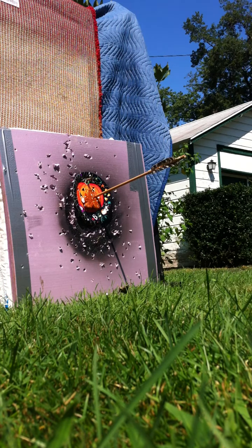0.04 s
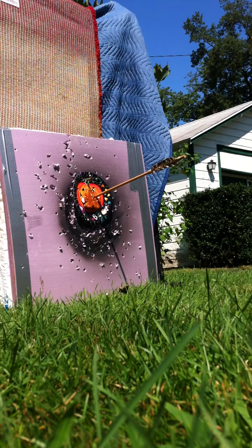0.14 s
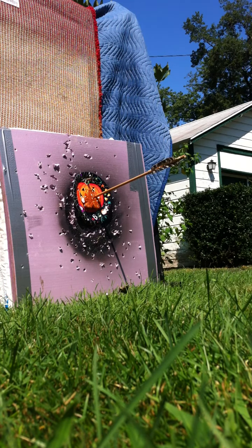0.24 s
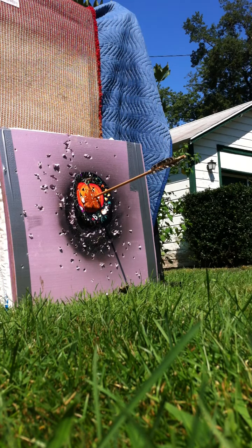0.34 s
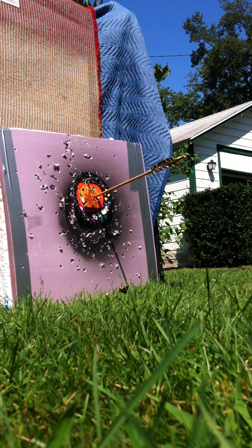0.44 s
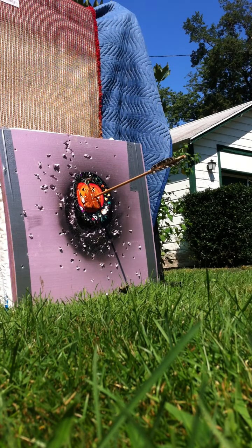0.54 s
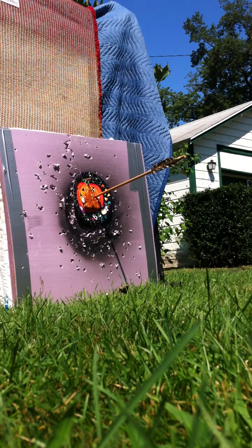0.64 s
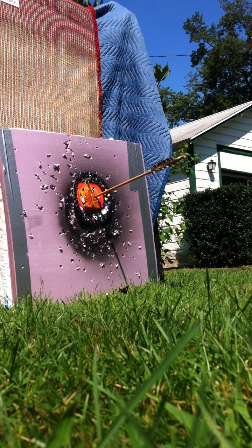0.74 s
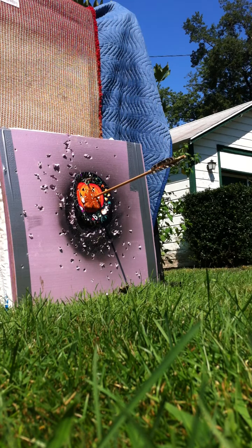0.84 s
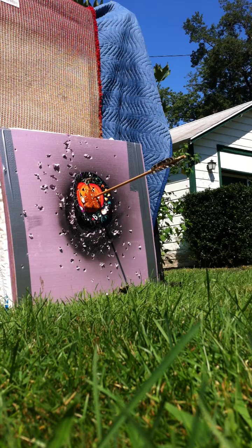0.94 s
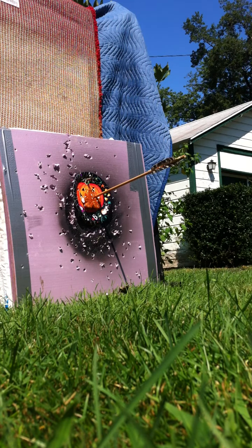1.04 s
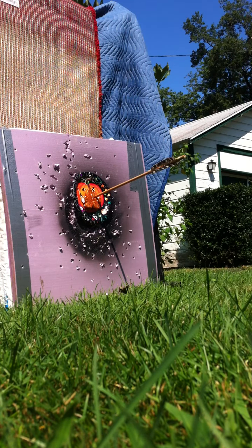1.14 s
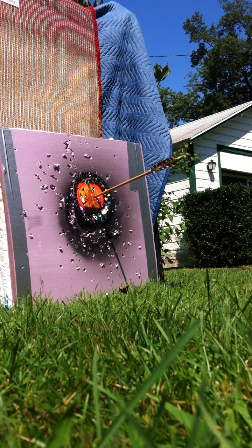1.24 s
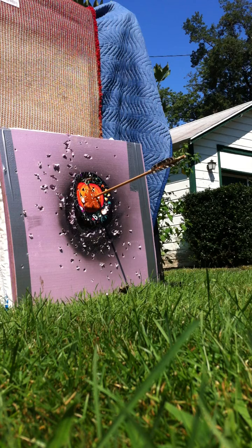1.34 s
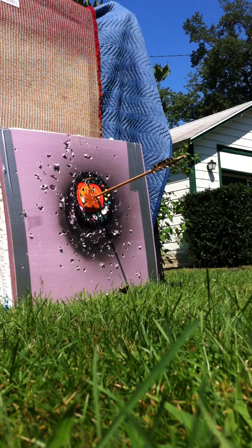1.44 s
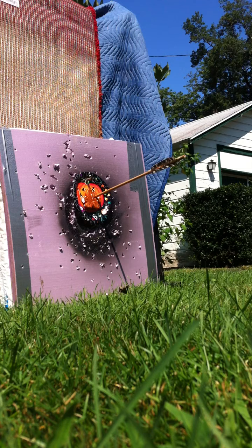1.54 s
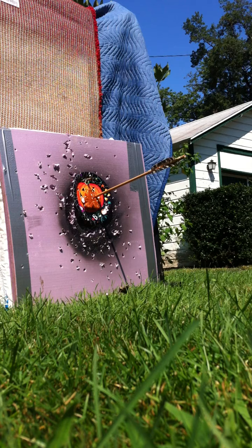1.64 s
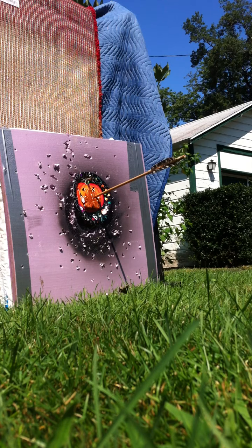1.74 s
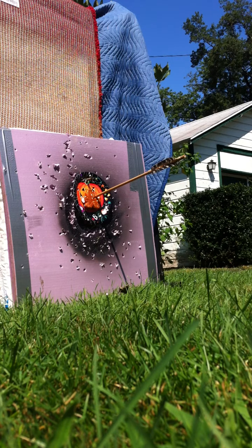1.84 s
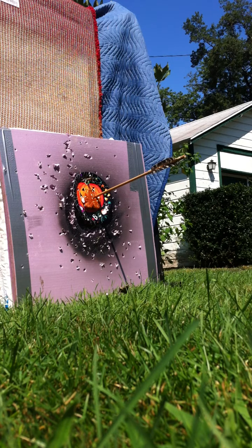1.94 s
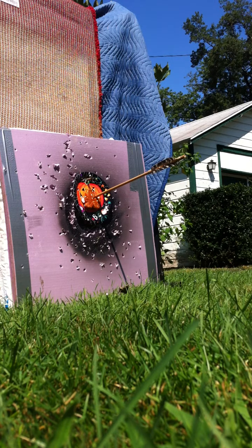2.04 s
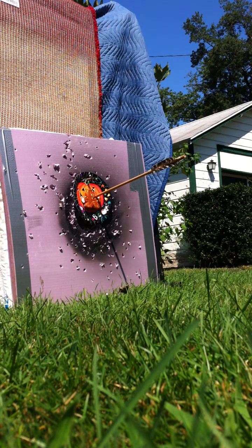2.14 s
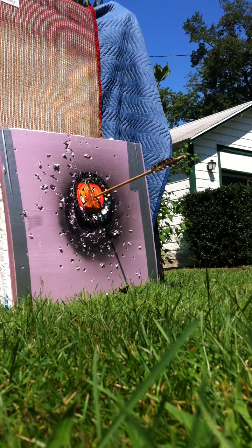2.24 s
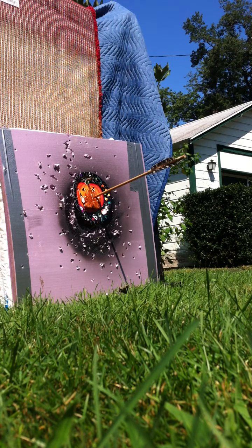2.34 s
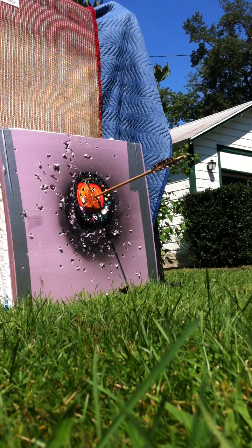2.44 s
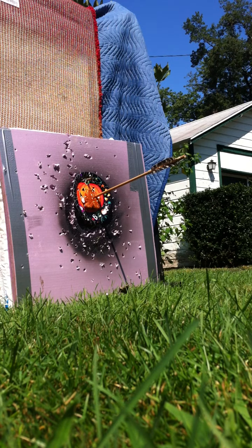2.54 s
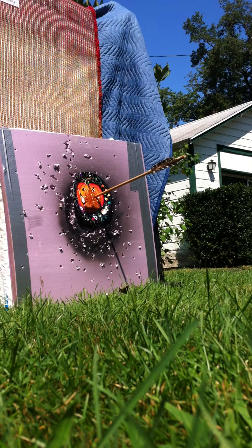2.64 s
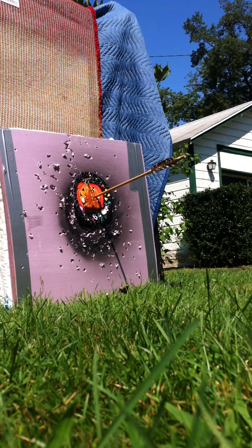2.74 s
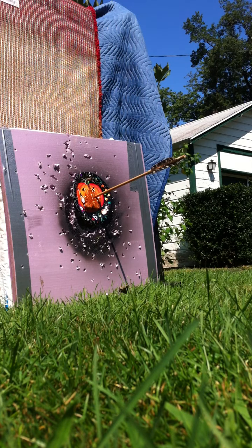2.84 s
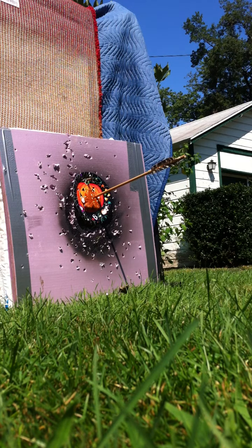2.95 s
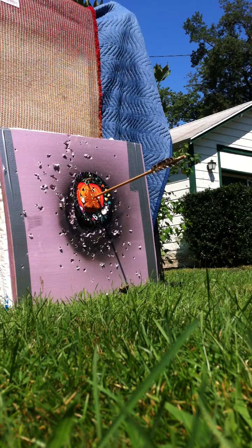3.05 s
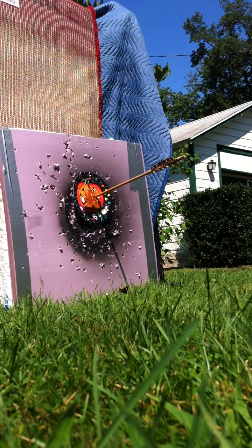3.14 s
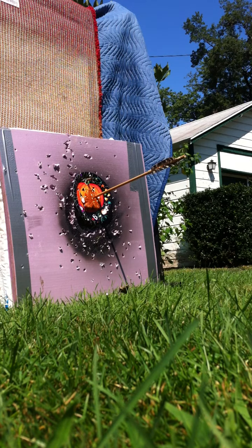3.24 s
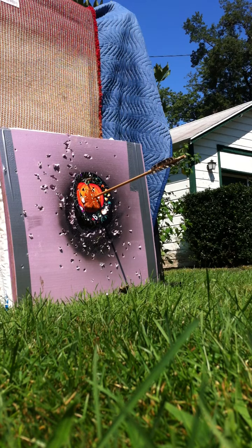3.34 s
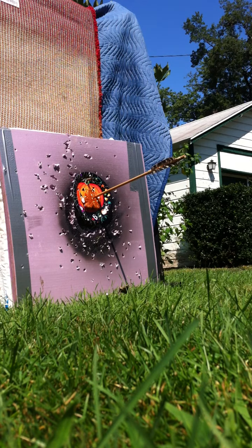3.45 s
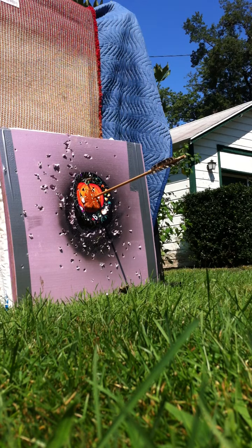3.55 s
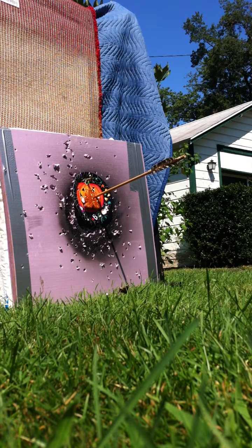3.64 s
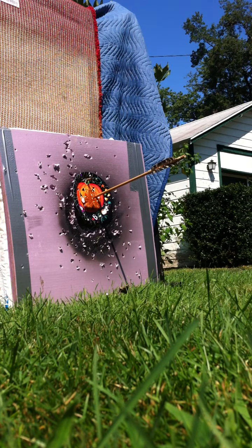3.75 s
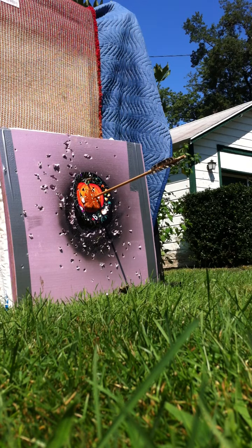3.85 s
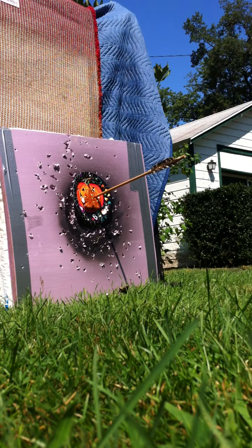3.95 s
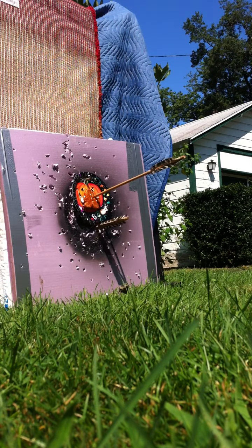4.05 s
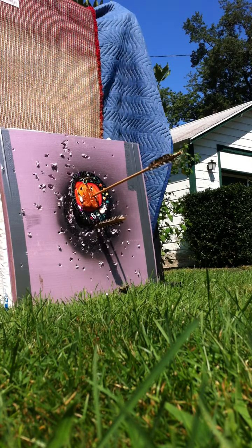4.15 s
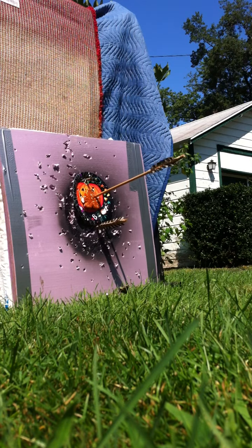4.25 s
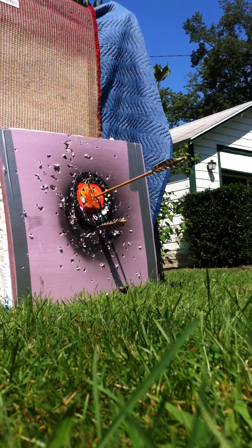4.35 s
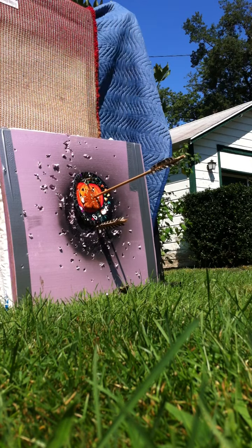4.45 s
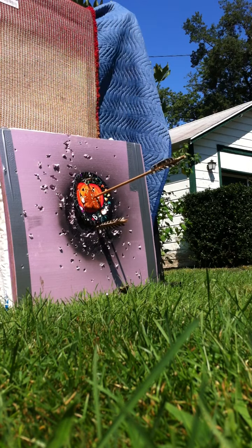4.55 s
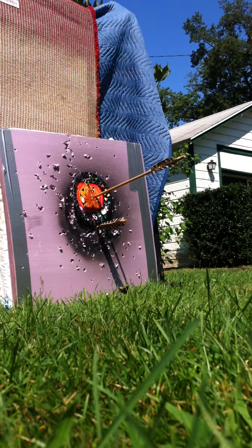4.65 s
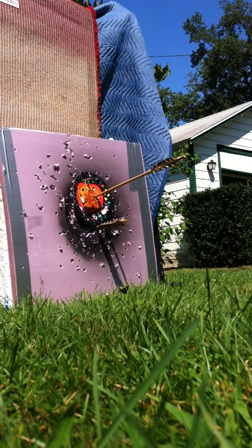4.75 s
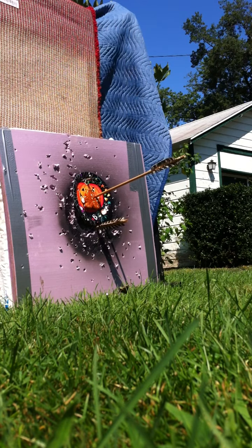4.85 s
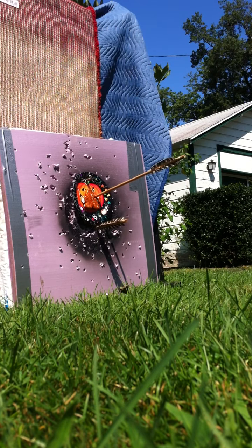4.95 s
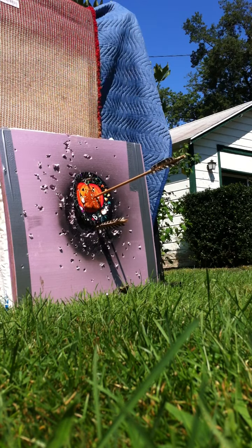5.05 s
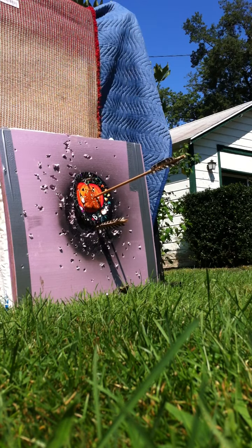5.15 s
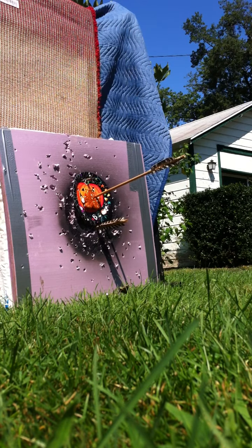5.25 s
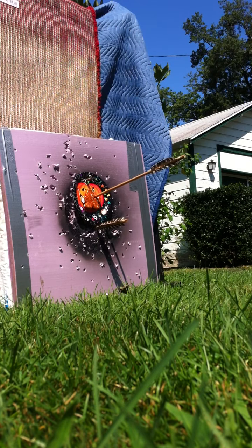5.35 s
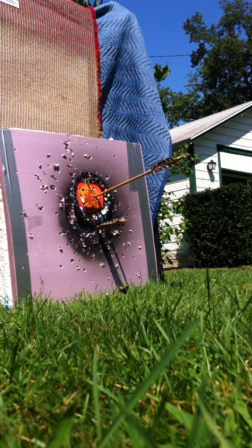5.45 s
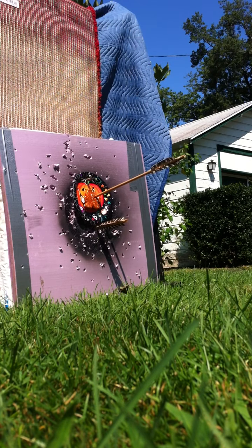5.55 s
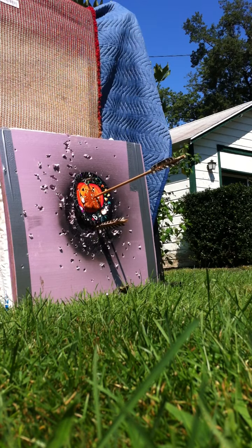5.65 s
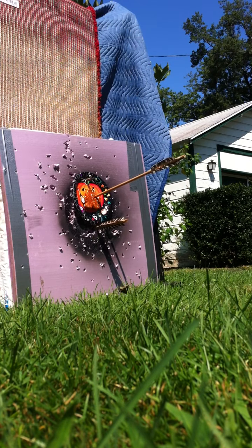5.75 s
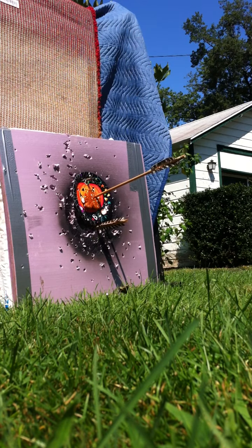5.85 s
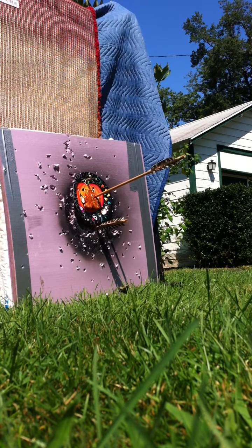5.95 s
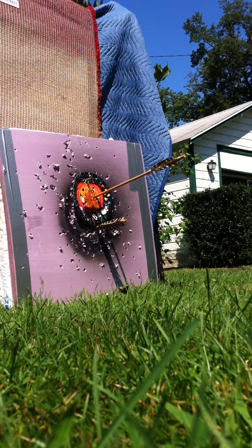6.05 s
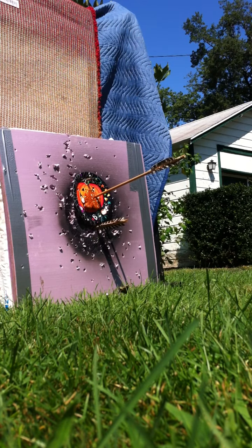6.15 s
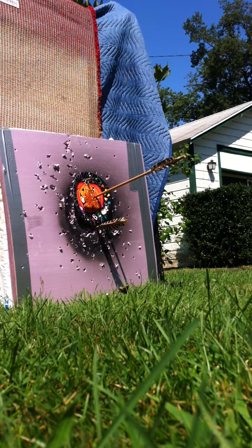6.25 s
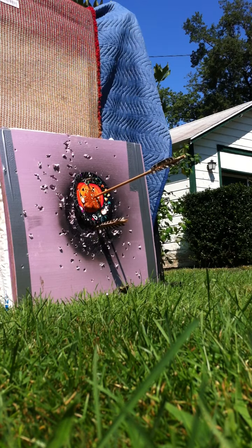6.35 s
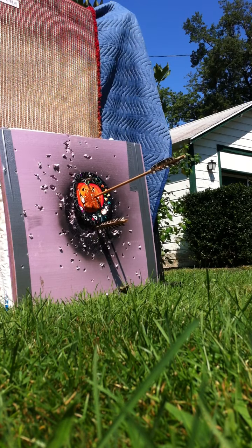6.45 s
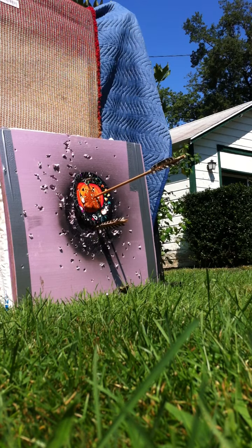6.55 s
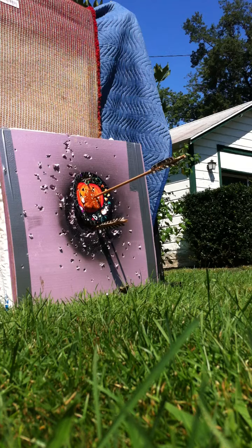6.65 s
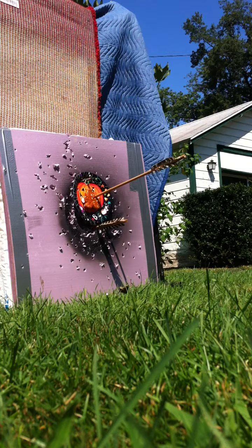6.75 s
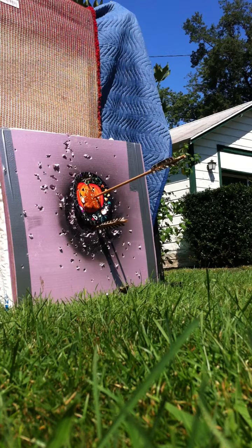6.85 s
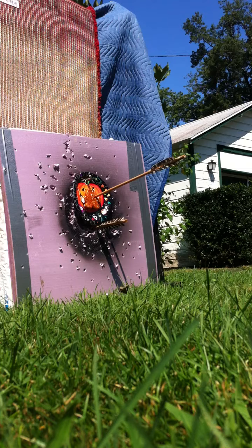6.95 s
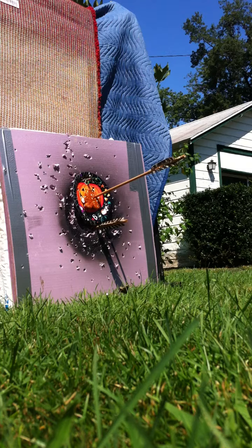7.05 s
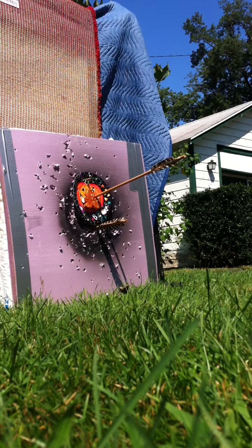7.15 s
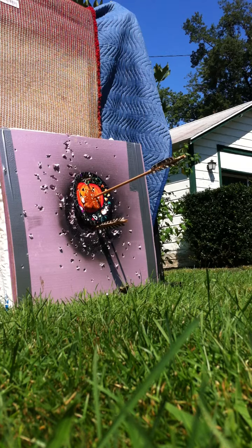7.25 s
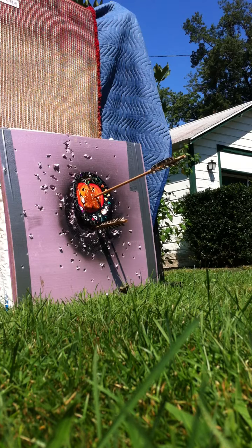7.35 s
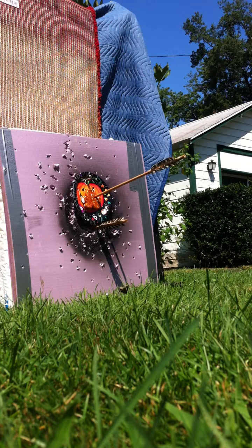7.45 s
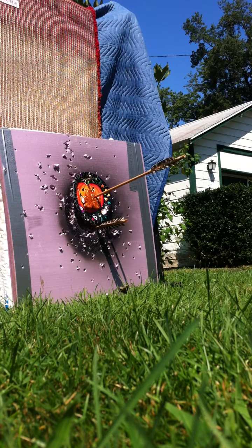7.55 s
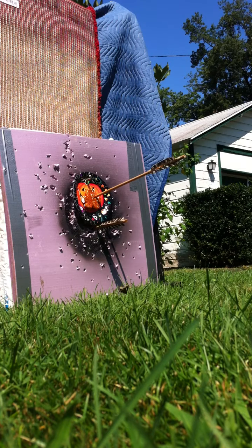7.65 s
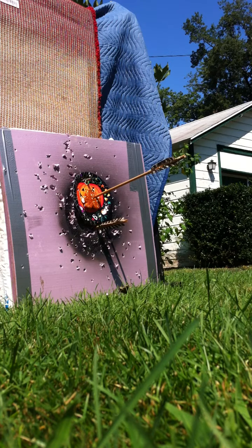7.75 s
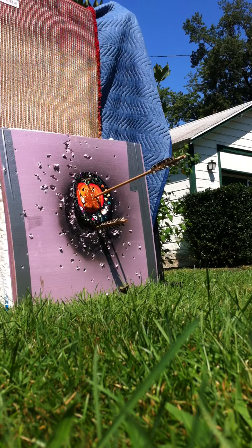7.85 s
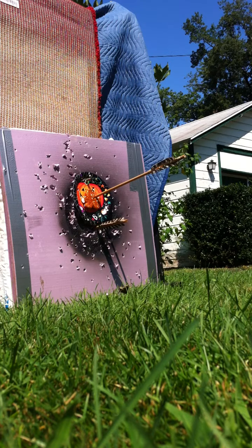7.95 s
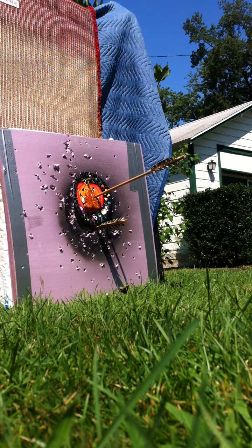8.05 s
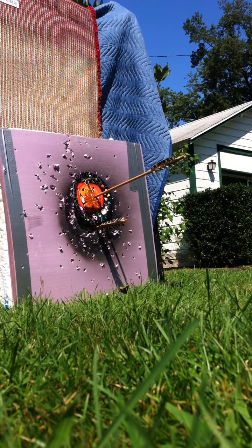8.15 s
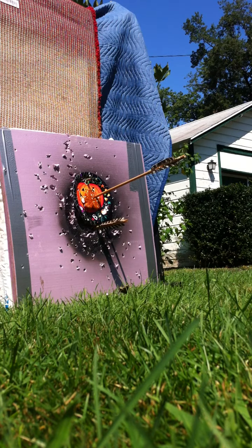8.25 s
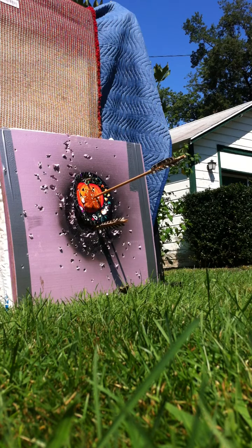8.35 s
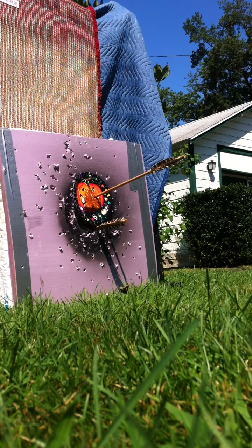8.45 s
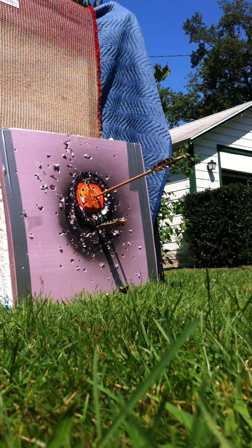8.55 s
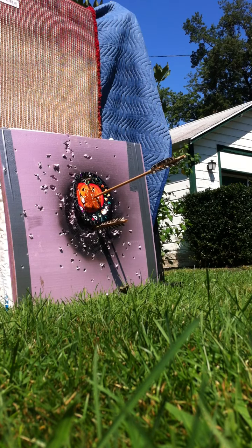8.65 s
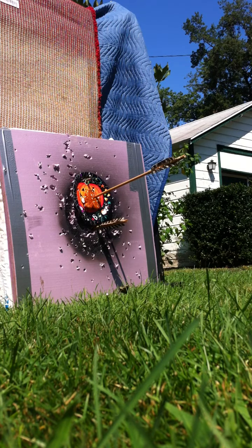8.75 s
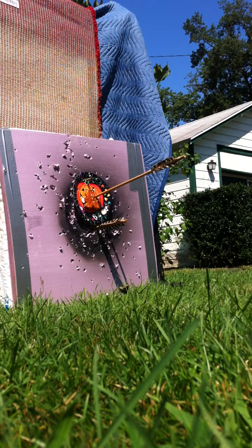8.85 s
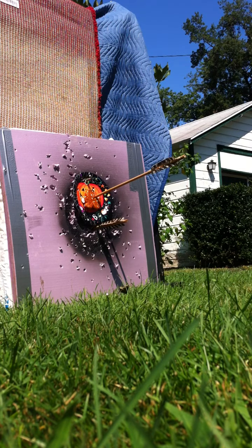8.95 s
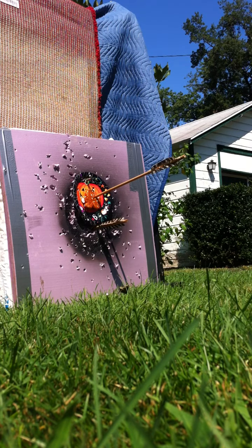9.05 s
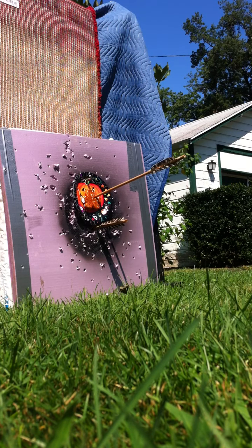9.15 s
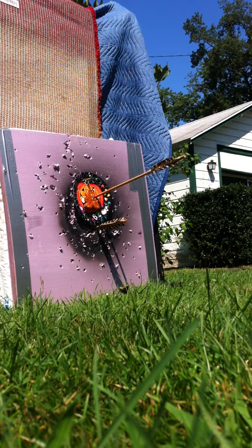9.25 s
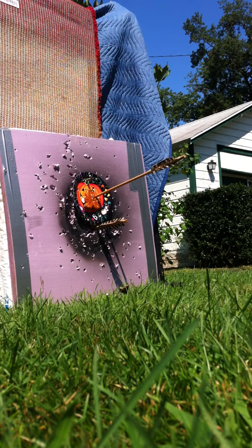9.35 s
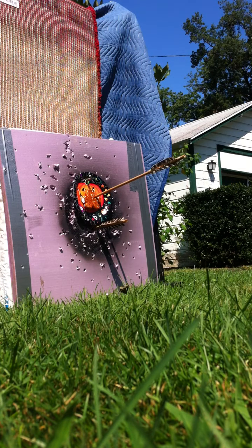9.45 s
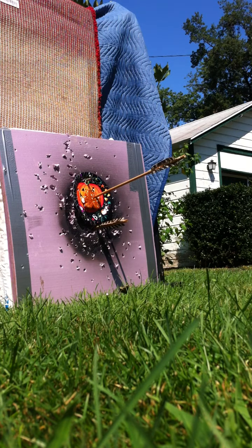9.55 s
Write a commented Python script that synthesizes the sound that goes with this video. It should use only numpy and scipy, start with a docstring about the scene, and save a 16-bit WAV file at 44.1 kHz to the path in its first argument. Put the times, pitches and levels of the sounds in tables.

```python
"""Arrow shot in a backyard

A bowstring ticks, feathers hiss past, and the arrow thumps into a nearby foam board: the board's
modes ring, the shaft cracks, the foam crunches. Gear ticks later. Crickets trill with their wings,
a far bird whistles falling notes and leaves rustle in gusts. Underneath, a propeller plane, a road
engine and a steady motor drone in harmonics over a wash of traffic."""
import sys
import numpy as np
from scipy import signal
from scipy.fft import rfft, irfft
from scipy.io import wavfile
from scipy.ndimage import uniform_filter1d

SR = 44100
rng = np.random.default_rng(int(sys.argv[2]) if len(sys.argv) > 2 else 0)


def put_to_file(sound):
    """Save the sound as 16-bit audio at rate SR, in the file named by the first command-line argument."""
    columns = np.atleast_2d(sound).T  # one column per channel
    safe = np.clip(columns, -1, 1)
    whole_steps = np.round(safe * 32767)
    wavfile.write(sys.argv[1], SR, whole_steps.astype(np.int16))


N = 423801
T = np.arange(N) / SR
IMPACT_S = 4.1849


# blows of tip, backing layers, stop: t/s, level/dB, contact/ms
BLOWS = [(4.1851, -22.4, 1.9), (4.1888, -26.5, .3), (4.1968, -21.6, .75), (4.2042, -24.1, 2.1)]
# board modes: f/Hz, level/dB, t60/s
BOARD_MODES = [(86.4, -2, 0.22), (119, -15, 0.21), (187, -38, 0.046), (222, 4, 0.14), (278, 3.5, 0.038),
               (306, 0.5, 0.061), (354, 2.5, 0.075), (430.6, 17.5, 0.072), (537, 7, 0.077), (570, 0, 0.069),
               (672, -2, 0.11), (716, -3, 0.045), (820, -3.5, 0.078), (880, -11, .07), (1112, -6.5, 0.078),
               (1280, -12, 0.076)]

def board_thump(cutoff_hz=142):
    """Each blow is a half-sine push that rings the board; a free panel radiates little deep bass."""
    t, out = T[:SR // 3], np.zeros(N)
    ring = sum(amp(db - 60 * t / t60) * np.sin(2 * np.pi * hz * t) for hz, db, t60 in BOARD_MODES)
    for s, db, contact_ms in BLOWS:
        push = np.sin(np.pi * np.clip(T[:400] / (contact_ms / 1000), 0, 1))
        add(out, s, amp(db) * np.convolve(ring, push / push.sum()))
    return signal.sosfilt(signal.butter(4, cutoff_hz, "high", fs=SR, output="sos"), out)


# shaft resonances: f/Hz, width/Hz, level/dB
SHAFT_MODES = [(3150, 500, -4), (4060, 450, 1), (5290, 500, -4), (6030, 450, -2), (8050, 900, -13),
               (11500, 1500, -10), (14900, 900, -18)]

def shaft_crack(level_db=-19.5, hold_s=0.002, t60_s=0.005, snap_db=4, snap_t60_s=0.004, bare_db=-5):
    """A burst of splintering foam excites the shaft at first contact."""
    t, out = T[:2000], np.zeros(N)
    body = amp(-60 * np.maximum(t - hold_s, 0) / t60_s)
    snap = amp(snap_db - 60 * t / snap_t60_s)
    burst = rng.standard_normal(len(t)) * (body + snap)
    ring = sum(amp(db) * unit_rms(resonate(burst, hz, width)) for hz, width, db in SHAFT_MODES)
    crack = amp(bare_db) * unit_rms(burst) + ring
    add(out, IMPACT_S, amp(level_db) * crack / np.std(crack[:120]))
    return out


# foam friction spectrum: f/Hz, density/dB
FOAM_SPECTRUM = [(500, -32), (900, 12), (1300, -4.5), (2000, -6), (3000, -2.5), (5000, -3.5), (7500, -12),
                 (9900, -24), (11700, -8), (16000, -19)]

def foam_scrape(level_db=-29.5, brake_s=0.086, settle_db=-57, settle_t60_s=0.4, crunch_db=2.5):
    """Crunchy foam noise dies ever faster as the shaft brakes, then settles faintly."""
    t, out = T[:SR // 4], np.zeros(N)
    braking = amp(level_db - 60 * (t / brake_s) ** 2)
    settling = amp(settle_db - 60 * t / settle_t60_s)
    envelope = (braking + settling) * np.minimum(t / 0.0042, 1)
    grains = unit_rms(uniform_filter1d(rng.standard_normal(len(t)), round(0.0015 * SR)))
    crunch = unit_rms(amp(crunch_db * grains))
    add(out, BLOWS[0][0], envelope * crunch * noise(FOAM_SPECTRUM, len(t)))
    return out


# feather hiss spectrum: f/Hz, density/dB
FEATHER_SPECTRUM = [(880, -42.5), (1500, -12), (2080, -1), (3620, -1), (4460, -1), (8240, -2), (13500, -6),
                    (16000, -15.5)]

def feather_hiss(release_s=3.9285, pass_s=4.158, speed_m_per_s=40, nearest_m=1.37, db_at_1m=-47.5):
    """The hiss swells as the arrow nears, passing the listener just before the board."""
    t, out = np.arange(release_s, IMPACT_S, 1 / SR), np.zeros(N)
    distance_m = np.hypot(nearest_m, speed_m_per_s * (pass_s - t))
    add(out, release_s, amp(db_at_1m) / distance_m ** 1.4 * noise(FEATHER_SPECTRUM, len(t)))
    return out


# three bowstring ticks, then three of gear: t/s, level/dB, f/Hz, width/Hz, t60/s
TICKS = [(3.91, -46, 2500, 3000, 0.079), (3.9285, -44.5, 5000, 7000, .025), (3.9435, -50, 4200, 1500, .04),
         (6.0498, -47.5, 4000, 5000, .02), (6.1422, -52, 5000, 4000, .015),
         (6.2122, -46, 5000, 3500, 0.032)]

def string_and_gear_ticks(crest_db=7):
    """Short noise bursts, each through one broad, steep resonance."""
    out = np.zeros(N)
    for s, db, hz, width, t60 in TICKS:
        burst = rng.standard_normal(3000) * amp(-60 * T[:3000] / t60)
        tick = resonate(resonate(burst, hz, width), hz, width)
        add(out, s, amp(db - crest_db) * tick / np.std(tick[:100]))
    return out


# house wall echoes: delay/s, level/dB
WALL_ECHOES = [(0.0605, -26), (.1055, -35)]

def yard(x, fence_db, fence_s=0.016, tail_db=-19, cutoff_hz=6000):
    """Adds fence and wall echoes and a diffuse tail; grass and hedges soak up their treble."""
    dull = signal.lfilter(*signal.butter(2, cutoff_hz, fs=SR), x)
    out = x + amp(tail_db) * reverb(dull, t60_s=0.3, rise_s=0.018)
    for delay_s, db in [(fence_s, fence_db)] + WALL_ECHOES:
        add(out, delay_s, amp(db) * (dull + 0.33 * x))
    return out


# near crickets: f/Hz, stroke rate/Hz, level/dB, duty/1, pitch scatter/Hz
CRICKETS = [(7610, 48.3, -62, 0.85, 24), (8150, 52.5, -65, 0.91, 29), (8080, 58, -68, .7, 39.8),
            (7460, 46, -72, 0.99, 40.), (7140, 46, -71.5, .7, 40.7), (8390, 54.5, -75, 0.77, 56)]
# far cricket spectrum: f/Hz, density/dB
CHORUS_SPECTRUM = [(5500, -31.5), (6500, -18.5), (7000, -11.5), (7150, -3.5), (7600, -4), (7830, -3.5),
                   (8000, 0), (8220, -3.5), (8400, -13), (8700, -28), (9200, -44)]

def crickets(chorus_db=-59, pitch_sag=0.012):
    """Each wing stroke is a tone pulse that sags in pitch; far crickets merge into a noise band."""
    out = amp(chorus_db + 0.29 * wander(3.4)) * noise(CHORUS_SPECTRUM, N)
    for k, (hz, rate_hz, db, duty, scatter_hz) in enumerate(CRICKETS):
        strokes = np.cumsum(rate_hz * (1 + 0.0121 * wander(3))) / SR + rng.random()
        progress = np.minimum(strokes % 1 / duty, 1)
        pitch_jitter, level_jitter = rng.standard_normal((700, 2))[strokes.astype(int)].T
        pitch_hz = hz * (1 - pitch_sag * (progress - 0.5)) + scatter_hz * pitch_jitter
        song = amp(1.2 * level_jitter) * np.sin(np.pi * progress) ** 2 * np.sin(phase_of(pitch_hz))
        drift_db = 0.54 * wander(7.4) if k == 0 else 1.4 * wander(6.5)  # nearest is steadiest
        out += amp(db + drift_db) * unit_rms(song)
    return out


# whistles: t/s, length/s, start f/Hz, level/dB, swell/dB
WHISTLES = [(-.15, 0.24, 3473, -65, 0.5), (2.86, 0.23, 3420, -65.5, -5), (3.328, .26, 3430, -65.5, -5),
            (5.003, 0.29, 3390, -68.5, -2.5), (6.85, 0.23, 3390, -70.5, 2), (7.442, .25, 3420, -70.5, 4.5),
            (9.444, 0.23, 3350, -72.5, 2)]

def bird(fall_hz=340, dip_db=2, flutter_db=3, flutter_s=0.016):
    """Falling sine whistles flutter in moving air and echo among far walls and trees."""
    span, out = round(flutter_s * SR), np.zeros(N)
    for s, length_s, start_hz, db, swell_db in WHISTLES:
        progress = np.arange(max(-s, 0) / length_s, 1, 1 / (length_s * SR))
        tone = np.sqrt(2) * np.sin(phase_of(start_hz - fall_hz * progress ** 1.35))
        fades = np.minimum(progress / 0.14, 1) * np.minimum((1 - progress) / 0.03, 1)
        jitter = uniform_filter1d(rng.standard_normal(SR // 2), span)
        flutter = unit_rms(uniform_filter1d(jitter, span))[:len(progress)]
        level_db = db + swell_db * progress - dip_db * np.sin(np.pi * progress) + flutter_db * flutter
        add(out, max(s, 0), amp(level_db) * fades * tone)
    return out + reverb(out, t60_s=0.84, rise_s=0.058)


# propeller fading: t/s, harmonic 2 level/dB, harmonic 3 level/dB
PROPELLER_LEVELS = [(0, -53.5, -70), (.8, -57.5, -78), (1.3, -71, -74), (2, -52.5, -63), (2.9, -72, -64),
                    (3.27, -48, -61), (3.48, -59, -59), (3.7, -50.5, -56), (4.5, -53, -54), (5.2, -64, -68),
                    (5.6, -56, -55), (6, -47.5, -52), (7.3, -52.5, -52.5), (7.6, -55, -62),
                    (8.1, -53.5, -68), (8.45, -51, -65), (8.7, -77, -57.5), (9.61, -54.5, -74)]
# upper propeller lines: harmonic, level/dB re harmonic 3
PROPELLER_UPPER = [(4, -14.5), (5, -17), (13, -27)]

def plane(blade_hz=87.45, sag_hz_per_s=0.153, far_db=-75, swell_db=10.5, nearest_s=6.4, swell_s=3.4):
    """Harmonics of the blade rate; air and ground make each fade on its own."""
    root_db = far_db + swell_db * np.exp(-((T - nearest_s) / swell_s) ** 2)
    second_db, third_db = curves(PROPELLER_LEVELS, T)
    phase = phase_of(blade_hz - sag_hz_per_s * T)
    lower = sum(amp(db + wander(5.2)) * np.sin(k * phase)
                for k, db in enumerate([root_db, second_db, third_db], 1))
    upper = sum(amp(third_db + db + 2.6 * wander(3.3)) * np.sin(k * phase) for k, db in PROPELLER_UPPER)
    return np.sqrt(2) * (lower + upper)


# engine cycle rate: t/s, f/Hz
ENGINE_RATE = [(0, 15.8), (.5, 15.5), (1.7, 13.93), (2.2, 13.88), (2.9, 13.3), (3.2, 13.6), (3.9, 15.7),
               (4.5, 16.9), (5.4, 17.1), (5.9, 16), (6.8, 15.5), (7.5, 13.4), (7.85, 13.15), (9.61, 13.15)]
# engine load: t/s, load/1
ENGINE_LOAD = [(0, 0.38), (.8, 0.04), (3.4, .2), (4.5, 1), (5.3, 0.95), (7.2, 0.28), (7.8, 0.3),
               (9.61, 0.44)]
# exhaust lines: harmonic, coasting level/dB, pulling level/dB
EXHAUST_LINES = [(6, -24, -11.5), (8, -14.5, -2), (9, -14, -18), (10, -8, 3), (11, -6, -18), (12, -2, 1.5),
                 (13, -7.5, -10), (14, -4.5, -6.5), (15, 0, -11), (16, 1.5, -24), (17, -9, -5.5),
                 (18, -9, -16.5), (19, -2, -19), (20, -11.5, -9.5), (21, -12, -23), (22, -11.5, -33),
                 (25, -10.5, -20.5)]

def road_engine(base_db=-56, recede_db_per_s=0.84, load_db=4.5):
    """Wavering harmonics of a receding engine's cycle; under load the even ones take over."""
    phase = phase_of(curves(ENGINE_RATE, T)[0])
    load = curves(ENGINE_LOAD, T)[0]
    overall_db = base_db - recede_db_per_s * T + load_db * load
    out = np.zeros(N)
    for k, coasting_db, pulling_db in EXHAUST_LINES:
        level_db = overall_db + (1 - load) * coasting_db + load * pulling_db + 2.76 * wander(8)
        slip = 2 * np.pi * rng.random() + 1.21 * wander(10)  # uneven firing blurs each line
        out += amp(level_db) * np.sin(k * phase + slip)
    return np.sqrt(2) * out


# hum lines: f/Hz, level/dB
MOTOR_LINES = [(140.8, -71), (281.6, -69.5), (352, -70), (422.5, -69)]

def motor_hum(waver_db=2):
    """Thin lines of steady pitch that waver in level."""
    return np.sqrt(2) * sum(amp(db + waver_db * wander(2)) * np.sin(2 * np.pi * hz * T)
                            for hz, db in MOTOR_LINES)


# traffic wash and hiss spectrum: f/Hz, density/dB
TRAFFIC_SPECTRUM = [(12, -49), (25, -28), (60, -20), (100, -9.5), (155, -2), (263, -1), (379, -6),
                    (879, -14.5), (1420, -24), (2480, -24.5), (5430, -31), (8000, -25), (9500, -36),
                    (16200, -33.5)]
# low-end swell: t/s, level/dB
TRAFFIC_SWELL = [(0, 1.5), (2, 1), (4.5, -1), (7.5, 0), (9.61, -3)]

def traffic_wash(level_db=-55, corner_hz=910, patch_db=0.75):
    """Patchy noise whose low end swells with the traffic."""
    hz, t, spectra = signal.stft(noise(TRAFFIC_SPECTRUM, N), SR, nperseg=1024)
    patches = uniform_filter1d(rng.standard_normal(spectra.shape), size=8, axis=0)
    patches = unit_rms(uniform_filter1d(patches, size=6, axis=1))
    low_weight = 1 / (1 + (hz[:, None] / corner_hz) ** 2)
    spectra *= amp(low_weight * curves(TRAFFIC_SWELL, t)[0] + patch_db * patches)
    return amp(level_db) * signal.istft(spectra, SR, nperseg=1024)[1][:N]


# rustle spectrum with two faint squeaks: f/Hz, density/dB
LEAF_SPECTRUM = [(900, -40), (1500, -15), (2600, 1), (2800, -0.5), (3000, -3.5), (4200, -3), (5300, -1),
                 (5480, -1), (5650, -3.5), (9500, -11), (11000, -26), (15000, -47)]
# gusts: t/s, level/dB, hold/s
GUSTS = [(0.114, -69, 0.041), (1.403, -70, .5)]

def leaves(breeze_db=-74.5, rise_s=0.087, t60_s=2.6):
    """Leaves rustle in a faint breeze and in uneven gusts that rise fast and die slowly."""
    gusts = np.zeros(N)
    for s, db, hold_s in GUSTS:
        rise = np.clip((T - s) / rise_s, 0, 1)
        gusts += rise * amp(db - 60 * np.maximum(T - s - hold_s, 0) / t60_s)
    return (amp(breeze_db) + gusts * amp(1.8 * wander(40))) * noise(LEAF_SPECTRUM, N)


def amp(db):
    return 10 ** (np.asarray(db) / 20)


def unit_rms(x):
    return x / np.sqrt(np.mean(x ** 2) + 1e-20)


def phase_of(hz):
    return 2 * np.pi * np.cumsum(hz) / SR


def curves(rows, t):
    """Each value column of a table, interpolated at times t."""
    s, *columns = np.transpose(rows)
    return [np.interp(t, s, column) for column in columns]


def add(mix, start_s, sound):
    part = mix[round(start_s * SR):][:len(sound)]
    part += sound[:len(part)]


def noise(spectrum, size):
    """Unit-rms noise, its spectrum interpolated over log frequency."""
    hz, db = np.transpose(spectrum)
    bin_hz = np.fft.rfftfreq(size, 1 / SR)
    gain = amp(np.interp(np.log(bin_hz + 1), np.log(hz + 1), db))
    return unit_rms(irfft(rfft(rng.standard_normal(size)) * gain, size))


def wander(top_hz):
    """Slow random drift of unit rms."""
    hz = np.geomspace(0.1, top_hz, num=16)
    coarse = np.sin(2 * np.pi * (np.outer(T[::512], hz) + rng.random(16))) @ hz ** -0.5
    return np.interp(T, T[::512], unit_rms(coarse))


def resonate(x, hz, width_hz):
    """Resonance of unit peak gain."""
    return signal.lfilter(*signal.iirpeak(hz, hz / width_hz, SR), x)


def reverb(x, t60_s, rise_s):
    """Diffuse echoes of x from a unit-energy noise tail."""
    t = T[:SR // 2]
    tail = rng.standard_normal(len(t)) * amp(-60 * t / t60_s) * np.minimum(t / rise_s, 1)
    return signal.oaconvolve(x, tail / np.linalg.norm(tail))[:N]


def scene():
    """The shot over the backyard's background, in mono."""
    shot = board_thump() + foam_scrape() + yard(shaft_crack(), fence_db=-21)
    shot += yard(string_and_gear_ticks(), fence_db=-6) + feather_hiss()
    background = crickets() + bird() + plane() + road_engine() + motor_hum() + traffic_wash() + leaves()
    return (shot + background)[None]


def record(dry):
    """Steep low-pass at 15.8 kHz."""
    lowpass = signal.firwin(511, 15800, window=("kaiser", 9), fs=SR)
    return signal.oaconvolve(dry, lowpass[None], "same")


dry = scene()
out = record(dry)
put_to_file(out)
```